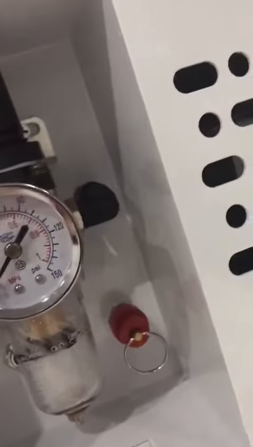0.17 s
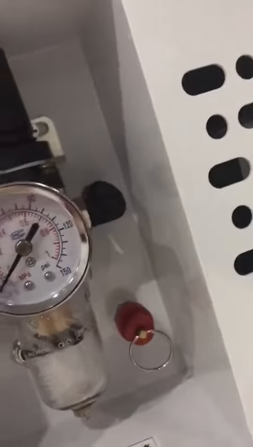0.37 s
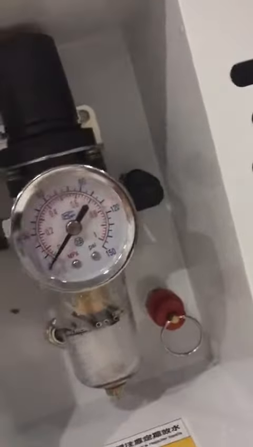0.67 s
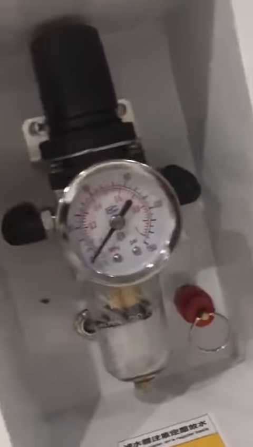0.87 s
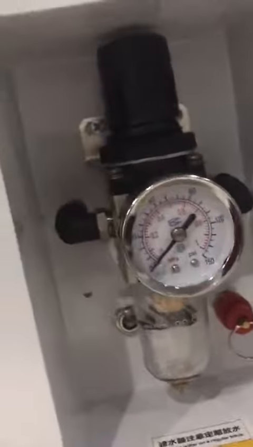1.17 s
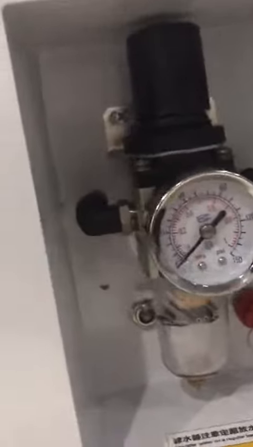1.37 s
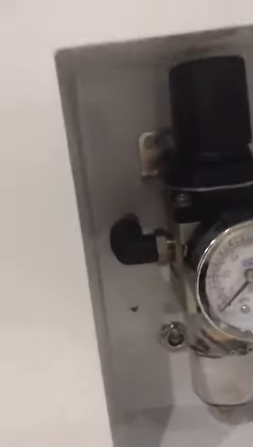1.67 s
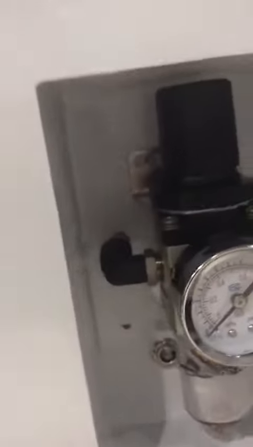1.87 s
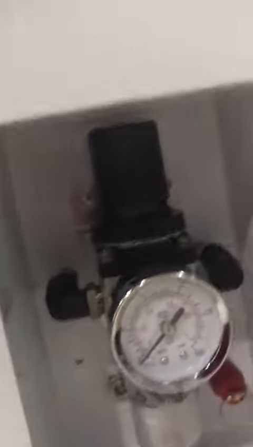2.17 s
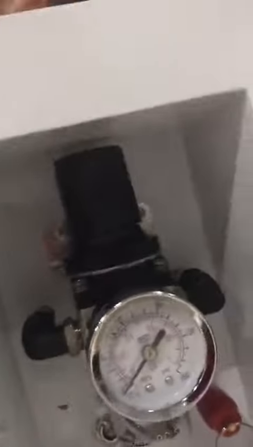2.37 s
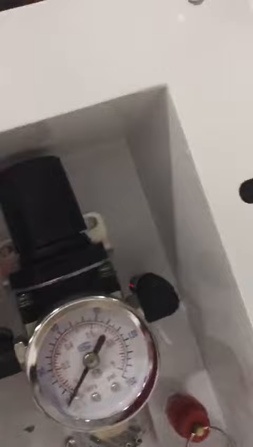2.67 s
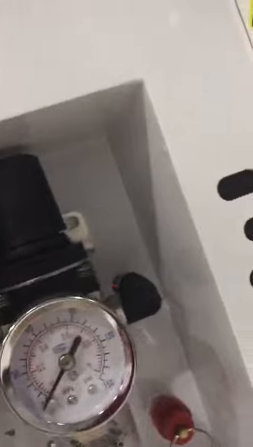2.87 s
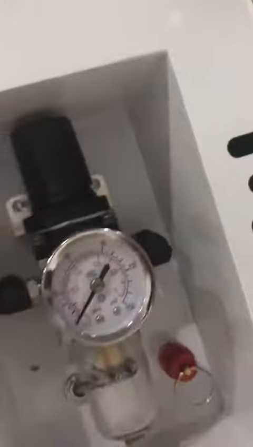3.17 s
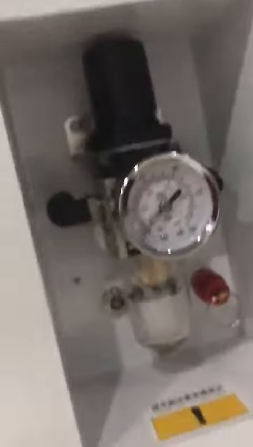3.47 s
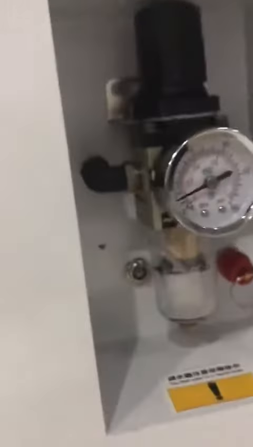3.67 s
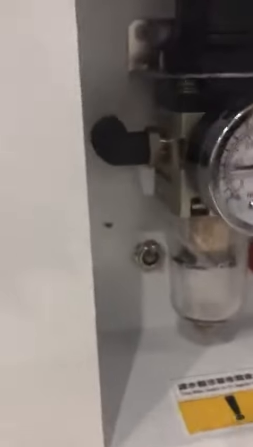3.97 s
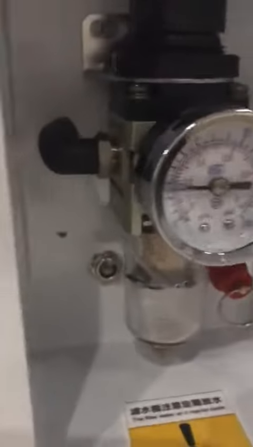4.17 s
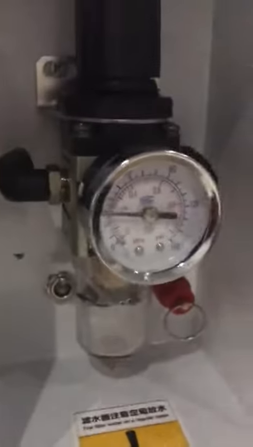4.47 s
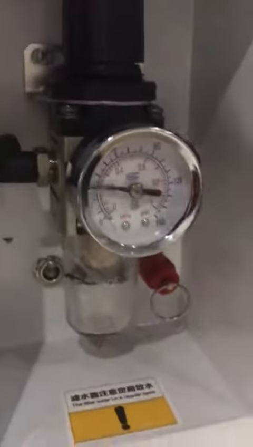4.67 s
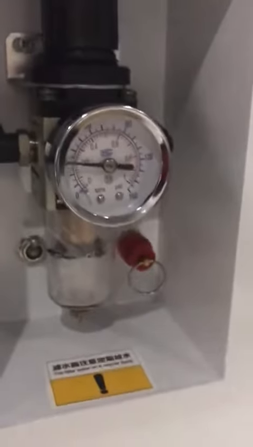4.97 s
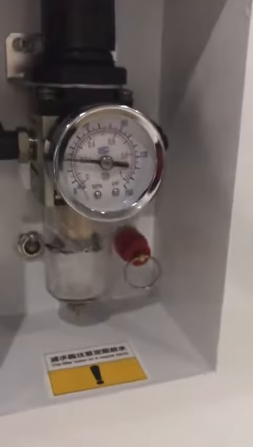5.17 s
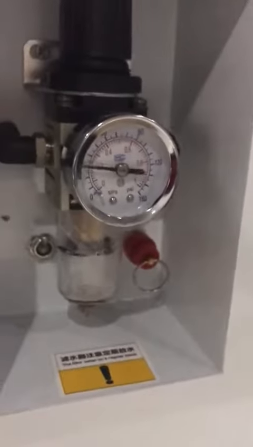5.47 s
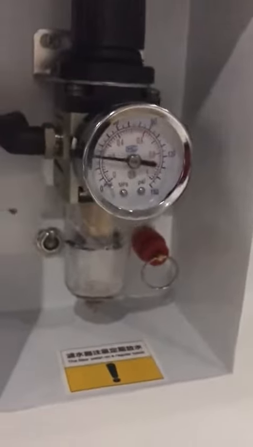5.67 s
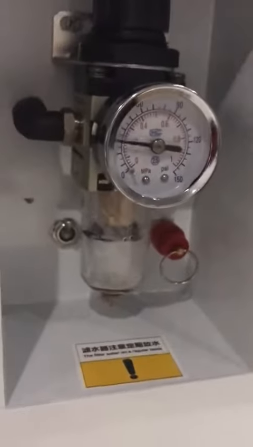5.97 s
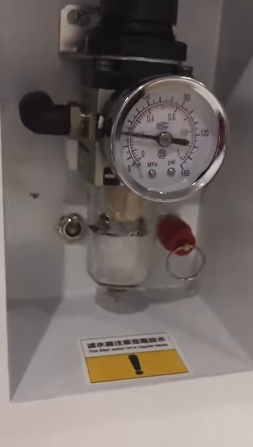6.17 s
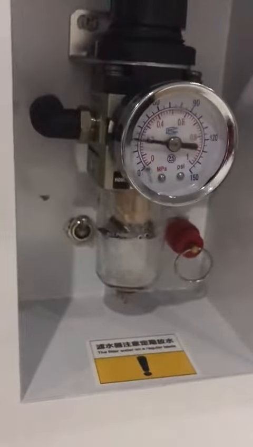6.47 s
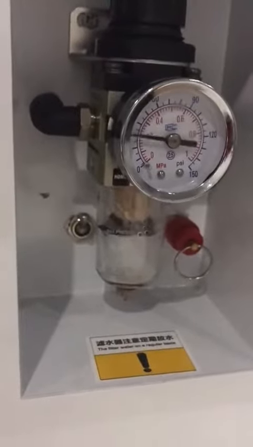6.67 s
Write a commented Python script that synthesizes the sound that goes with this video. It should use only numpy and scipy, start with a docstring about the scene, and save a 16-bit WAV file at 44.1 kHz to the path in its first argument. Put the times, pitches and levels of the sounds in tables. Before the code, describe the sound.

In a ventilated machine room a switch snaps twice, a relay cracks hard, and a small air compressor starts and chugs with gritty hiss.

```python
"""Duct rumble and faint fan tones come first: a ventilated machine room, one microphone in front of a cabinet.
A switch is pressed and let go, something knocks dully behind the panel, then a contactor slams in and
the motor pulls up with a short hum. In the sheet-metal cabinet a small piston air compressor settles near
24 turns a second: a low throb, a rasp of air and valve taps on every turn, over a steady hiss.
Air and cracks are filtered noise, knocks and taps are decaying sines, the throb is a sum of crank multiples."""
import sys
import numpy as np
from scipy import signal
from scipy.fft import rfft, irfft, next_fast_len
from scipy.io import wavfile
from scipy.ndimage import uniform_filter1d

SR = 44100
rng = np.random.default_rng(int(sys.argv[2]) if len(sys.argv) > 2 else 0)


def int16_out(signal):
    """Quantize to a 16-bit WAV file."""
    q = np.round(np.clip(np.atleast_2d(signal).T, -1, 1) * 32767)
    wavfile.write(sys.argv[1], SR, q.astype(np.int16))


N = 300762
TIME = np.arange(N) / SR  # seconds
SIZE = next_fast_len(N + SR, real=True)  # transform length, with a spare second for filter tails
HZ = np.maximum(np.arange(SIZE // 2 + 1) * SR / SIZE, 1)  # kept above 0 for the logarithm
ROOM_T60_S = 0.56


def from_db(db):
    """Decibels to gain."""
    return 10 ** (np.asarray(db) / 20)


def rms_one(x):
    """Scale to unit rms."""
    return x / np.sqrt(np.mean(x ** 2) + 1e-20)


def white():
    """Fresh white noise."""
    return rng.standard_normal(N)


def drift(rate):
    """Straight lines between random points, `rate` points a second; the last of 4096 points is held."""
    return np.interp(TIME * rate, np.arange(4096), rng.standard_normal(4096))


def ramp(start_s, length_s):
    """Straight rise from 0 to 1."""
    return np.clip((TIME - start_s) / length_s, 0, 1)


def slope(points):
    """Gain over frequency from (Hz, dB) points, joined on a logarithmic frequency axis."""
    hz, db = np.transpose(points)
    return from_db(np.interp(np.log(HZ), np.log(hz), db))


def peaks(resonances):
    """Gain over frequency of (Hz, width Hz, dB) resonances with steep skirts, added in power."""
    power = 0
    for hz, width, db in resonances:
        power = power + from_db(2 * db) / (1 + ((HZ - hz) / width) ** 2 * 2) ** 2
    return np.sqrt(power)


def colour(x, gain):
    """Causal (minimum-phase) filter that keeps the level of white noise, so only the gain's shape counts."""
    cepstrum = irfft(np.log(rms_one(gain) + 1e-6))
    # folding the cepstrum forward in time makes the phase minimal
    cepstrum[1:SIZE // 2] *= 2
    cepstrum[SIZE // 2 + 1:] = 0
    response = np.exp(rfft(cepstrum))
    return irfft(rfft(x, SIZE) * response)[:N]


def clicks(times, db):
    """Single-sample blows."""
    out = np.zeros(N)
    places = np.clip(np.round(np.asarray(times) * SR).astype(int), 0, N - 1)
    np.add.at(out, places, from_db(db))
    return out


def ring(blows, modes):
    """Blows set decaying sines (Hz, dB, t60 s) ringing, with alternating polarity from mode to mode."""
    out = np.zeros(N)
    for k, (hz, db, t60) in enumerate(modes):
        radius = from_db(-60 / (t60 * SR))  # decay per sample
        angle = 2 * np.pi * hz / SR
        resonator = [1, -2 * radius * np.cos(angle), radius * radius]
        mode = signal.lfilter([0, np.sin(angle)], resonator, blows + 1e-18)
        out += (-1) ** (k + 1) * from_db(db) * mode
    return out


def bursts(times, levels_db, t60s):
    """Crowds of high modes, heard as noise that dies quickly after each blow."""
    fade = np.zeros(N)
    for s, db, t60 in zip(times, levels_db, t60s):
        decay = np.exp(-np.log(1000) * np.clip((TIME - s) / t60, 0, 10))
        fade += from_db(db) * (TIME >= s) * decay
    return fade * white()


def room(x, wet_db):
    """Add the diffuse tail of the machine room, as decaying noise with a softened top."""
    t = TIME[:SR]
    tail = rng.standard_normal(SR) * np.exp(-np.log(1000) * t / ROOM_T60_S) * (1 - np.exp(-t / 0.00046))
    tail = signal.sosfilt(signal.butter(1, 9000, fs=SR, output="sos"), tail)
    return x + from_db(wet_db) * signal.fftconvolve(x, tail / np.linalg.norm(tail))[:N]


# Rumble of the ventilation. Each row: frequency in Hz, relative density in dB.
VENT = [(15, -51), (25, -12.5), (54, -0.5), (91, -6.5), (126, -3), (208, -7), (318, -12.5), (414, -15),
        (448, -21.5), (569, -19.5), (781, -25), (846, -21), (1560, -29), (2860, -37), (14000, -57.5)]
# Resonances of the ducts. Each row: frequency in Hz, width in Hz, relative level in dB.
DUCT = [(45.7, 5.2, -0.5), (129.2, 21, 3.5), (207.7, 24, 1), (960, 450, -34), (2924, 42, -24)]
# Fan tones. Each row: frequency in Hz, middle level in dB (rms).
VENT_TONES = [(371.4, -60.5), (414.3, -54)]
VENT_DB, DUCT_DB = -41.5, -44.5


def ventilation():
    """Noise shaped into duct rumble, with faint fan tones that waver in level and phase."""
    rumble = from_db(VENT_DB) * colour(white(), slope(VENT))
    ducts = from_db(DUCT_DB) * colour(white(), peaks(DUCT))
    tones = np.zeros(N)
    for hz, db in VENT_TONES:
        level = from_db(db + 1.9 * drift(7.7)) * np.sqrt(2)
        tones += level * np.sin(2 * np.pi * hz * TIME + 2.1 * drift(3.2))
    return rumble + ducts + tones


# Contacts of the switch. Each row: time in seconds, snap in dB, panel ring in dB, low thud in dB,
# t60 of the snap in seconds.
SWITCH = [(1.677, -50, -64, -51, 0.068), (1.8618, -26, -33, -31, 0.066), (1.8675, -39, -33, -30, 0.014),
          (1.876, -56, -48, -42, 0.026), (1.89, -64, -52, -35, .03), (1.942, -47, -49, -52, 0.15),
          (1.9539, -25, -31, -45, 0.049), (1.9596, -36, -31, -46, 0.08)]
# Colour of the plastic snap. Each row: frequency in Hz, relative level in dB.
SNAP = [(200, -28), (550, -8), (900, 7.5), (1450, 0.5), (2000, 4.5), (2300, 2), (3000, 1), (4500, -7),
        (6000, -8.5), (7600, -4.5), (10000, -10.5), (14000, -16)]
# Hollow resonances of the thud. Each row: frequency in Hz, width in Hz, relative level in dB.
THUD = [(263, 150, 8), (650, 320, 3), (850, 280, 4)]
# The panel answers press and release differently. Each row: frequency in Hz, dB on the press,
# dB on the release, t60 in seconds.
PANEL = [(655, -13, -22, 0.056), (800, -5, -11, 0.044), (880, -8, -3, 0.055), (984, -3, -14, .04),
         (1126, -13, -7, .04), (1645, -13, -15, .06), (1950, -2, -2, 0.05), (2490, -21, -8, .04),
         (3320, -22, -4, .04)]
# Dull, diffuse afterglow of the panel. Each row: frequency in Hz, width in Hz, relative level in dB.
AFTERGLOW = [(896, 320, -2), (1500, 710, -14)]
AFTERGLOW_DB, AFTERGLOW_T60_S = -17.5, 0.55  # level against the panel ring
RELEASE_S = 1.92  # contacts from here on belong to the release


def switch():
    """Press and release: a plastic snap that rings the panel, a hollow rattle as the button bottoms out."""
    s, snap_db, ring_db, thud_db, t60 = np.transpose(SWITCH)
    snap = colour(bursts(s, snap_db, t60), slope(SNAP))
    thud = colour(bursts(s, thud_db, 2.46 * t60), peaks(THUD))
    glow_t60 = np.full(len(s), AFTERGLOW_T60_S)
    afterglow = colour(bursts(s, ring_db + AFTERGLOW_DB, glow_t60), peaks(AFTERGLOW))
    blows = clicks(s, ring_db)
    press_modes = [(hz, db, t) for hz, db, _, t in PANEL]
    release_modes = [(hz, db, t) for hz, _, db, t in PANEL]
    press = ring(blows * (TIME < RELEASE_S), press_modes)
    release = ring(blows * (TIME >= RELEASE_S), release_modes)
    return room(snap + thud, wet_db=-16.5) + press + release + afterglow


# Dull knock inside the cabinet. Each row: time in seconds, level in dB.
KNOCK = [(3.009, -35), (3.012, -21.5)]
# Its ring. Each row: frequency in Hz, level in dB, t60 in seconds.
KNOCK_RING = [(73.6, -7.5, 0.35), (242, -10, 0.17)]
# Its short, heavily damped body. Each row: frequency in Hz, width in Hz, relative level in dB.
KNOCK_BODY = [(450, 170, -6), (810, 210, 4), (1260, 150, -12)]
KNOCK_BODY_DB, KNOCK_BODY_T60_S = 0.5, 0.027  # level against the knock
KNOCK_TICK_DB, KNOCK_TICK_T60_S = -35.5, 0.04


def knock():
    """A soft double contact behind the panel: low ringing sines, a damped noise body and a faint tick."""
    s, db = np.transpose(KNOCK)
    # the tick shares the colour of the contactor's crack
    tick = colour(bursts(s, db + KNOCK_TICK_DB, np.full(len(s), KNOCK_TICK_T60_S)), slope(CRACK))
    body = colour(bursts(s, db + KNOCK_BODY_DB, np.full(len(s), KNOCK_BODY_T60_S)), peaks(KNOCK_BODY))
    return room(tick + body + ring(clicks(s, db), KNOCK_RING), wet_db=-15)


# Contactor: first touch, armature home, bounces. Each row: time in seconds, crack in dB, clunk in dB,
# cabinet boom in dB, t60 of the crack in seconds.
CONTACTOR = [(3.2662, -16.5, -27, -40, 0.022), (3.272, -19, -25, -13.5, 0.029),
             (3.2743, -15, -23, -17, 0.03), (3.277, -16.5, -21.5, -23, 0.038),
             (3.287, -34, -35, -37, 0.045), (3.295, -34, -30, -31, 0.055), (3.301, -46, -45, -41, .04)]
# Colour of the crack. Each row: frequency in Hz, relative level in dB.
CRACK = [(200, 7), (800, -12), (1600, -2), (2500, 6), (4100, 1.5), (4600, 7.5), (5100, 5), (6500, 2),
         (9000, 5), (12300, 8), (13200, 2), (14500, -16)]
# Crowded resonances of the mounting plate. Each row: frequency in Hz, width in Hz, relative level in dB.
CLUNK = [(190, 66, 5.5), (320, 110, -1), (640, 55, 5), (950, 81, -5), (1400, 140, -2), (1706, 72, 4),
         (1920, 57, -3), (2260, 81, -13), (2510, 160, -5), (3520, 110, -7), (4560, 120, -7)]
# Boom of the cabinet. Each row: frequency in Hz, level in dB, t60 in seconds.
CABINET = [(99, -1.5, 0.092), (159, 2, 0.06), (200, -5.5, 0.08), (245, -11, 0.07), (339, -12.5, 0.06),
           (424, -15.5, 0.069), (635, -10.5, 0.061), (950, -13, 0.05)]
# The loose panels shiver on after the slam. Each row: frequency in Hz, relative level in dB.
SHIVER = [(100, 0), (180, 16), (300, 15), (550, -10), (950, -6), (1300, 12.5), (1900, 1), (2800, 0),
          (3500, -12), (4500, -8), (7000, -10), (10000, -4), (13000, -19)]
CLUNK_T60_S = 0.038
SHIVER_DB, SHIVER_T60_S = -19.5, 0.3  # level against the cabinet boom


def contactor():
    """The armature slams home with a bright crack and a dry clunk, booms the cabinet and shivers its panels."""
    s, crack_db, clunk_db, boom_db, t60 = np.transpose(CONTACTOR)
    crack = colour(bursts(s, crack_db, t60), slope(CRACK))
    clunk = colour(bursts(s, clunk_db, np.full(len(s), CLUNK_T60_S)), peaks(CLUNK))
    shiver = colour(bursts(s, boom_db + SHIVER_DB, np.full(len(s), SHIVER_T60_S)), slope(SHIVER))
    boom = ring(clicks(s, boom_db), CABINET)
    return clunk + room(crack, wet_db=-15) + shiver + room(boom, wet_db=-8.0)


# Magnetic hum while the motor pulls up. Each row: time in seconds, middle level in dB (rms).
HUM_LEVEL = [(3.40, -62), (3.43, -40), (3.46, -46), (3.5, -27.5), (3.53, -34), (3.56, -28.5), (3.62, -40),
             (3.685, -34), (3.76, -55)]
HUM_HZ, RUNNING_HUM_DB, RUNNING_HUM_RISE_S = 99.1, -43.5, 0.23


def motor_hum():
    """The motor hums unsteadily under its starting load, and more softly once it is up to speed."""
    s, db = np.transpose(HUM_LEVEL)
    starting = from_db(np.interp(TIME, s, db)) * (TIME > s[0]) * (TIME < s[-1])
    running = from_db(RUNNING_HUM_DB) * ramp(s[-1], RUNNING_HUM_RISE_S)
    waver = from_db(1.3 * drift(40))
    tone = np.sqrt(2) * np.sin(2 * np.pi * HUM_HZ * TIME + 0.51 * drift(28))
    return (starting + running) * waver * tone


# Shaking of the cabinet. Each row: multiple of the crank speed, relative level in dB.
THROB = [(1, -24), (2, 3), (3, 3), (4, -4), (5, -4), (6, -4), (7, -2.5), (8, -18.5), (9, -14), (10, -18),
         (11, -18), (12, -18.5), (13, -23), (14, -14.5), (15, -17)]
# The third multiple swells and sinks. Each row: time in seconds, change of its level in dB.
THIRD_SWELL = [(3.5, -23), (4.0, -1), (4.9, 0), (5.6, -4.5), (6.8, -7)]


def throb(turns):
    """The piston shakes the cabinet at multiples of the crank speed; panels smear each kick over the turn."""
    swell_db = np.interp(TIME, *np.transpose(THIRD_SWELL))
    total = np.zeros(N)
    for k, db in THROB:
        level = from_db(db + (k == 3) * swell_db) * from_db(1.2 * drift(6))
        # k * k / 14 spreads the phases, so the kicks are smeared
        total += level * np.sin(2 * np.pi * (k * turns + k * k / 14 + .05 * drift(7)))
    return rms_one(total)


# Valve taps in each turn. Each row: crank angle as a part of a turn, middle level in dB.
TAPS = [(0.54, -35.5), (0.665, -37), (0.99, -39)]
# Their ring. Each row: frequency in Hz, level in dB, t60 in seconds.
VALVE = [(370, -10.5, 0.028), (666, -10, 0.042), (790, -1.5, 0.014), (896, -0.5, 0.033), (985, 2, 0.012),
         (1060, -2, 0.04), (1115, -6.5, 0.023), (1350, -2, .016)]


def valves(turns):
    """The reeds tap shut at fixed crank angles, nearly alike on every turn, and ring as decaying sines."""
    whole = np.arange(int(turns[-1]))
    uneven_db = rng.normal(0, 1.5, len(whole))  # shared by the taps of a turn
    blows = np.zeros(N)
    for angle, db in TAPS:
        blows += clicks(np.interp(whole + angle, turns, TIME), db + uneven_db)
    return ring(blows, VALVE)


def stroke(turns, shape):
    """Air flow over each turn: the reed opens quickly, holds and closes slowly."""
    opens, attack, hold, release = shape
    return np.interp((turns - opens) % 1, np.cumsum([0, attack, hold, release]), [0, 1, 1, 0])


# crank speed under load; it starts a little faster and settles with this time constant
TURNS_PER_S, UNLOADED_EXTRA_HZ, SETTLE_S = 24.16, .21, .5


def even(x):
    """Narrow the differences in power from turn to turn: every stroke moves about the same air."""
    turn_power = uniform_filter1d(rms_one(x) ** 2, int(SR / TURNS_PER_S))
    return rms_one(x / (turn_power + .1) ** .25)


# Bright spit of air as the reed lifts. One row, in parts of a turn: opens at, attack, hold, release.
SPIT = (.7, .12, .08, .42)
SPIT_ABOVE_HZ = 4300


def spit(turns):
    """A bright jet of air in every gulp: gated noise with the low end cut."""
    highpass = signal.butter(2, SPIT_ABOVE_HZ, "high", fs=SR, output="sos")
    return signal.sosfilt(highpass, stroke(turns, SPIT) * white())


# Flow through the valve. One row, in parts of a turn: opens at, attack, hold, release.
GULP = (.55, .2, .27, .38)
# Resonances of the pump head and air filter. Each row: frequency in Hz, width in Hz, relative level in dB.
HEAD = [(1058, 38, -3.2), (1140, 60, -11), (1287, 50, .8), (1360, 56, -1.8), (1655, 54, -2.3),
        (1738, 35, -8), (1834, 28, -4.5), (1944, 36, -5), (2035, 36, -9), (2102, 38, -5),
        (2290, 120, -11.5), (2480, 125, -10), (2905, 65, -9.7), (3290, 50, -15), (3415, 60, -8),
        (3560, 150, -15.5), (3880, 90, -17.5), (4080, 150, -17), (4380, 80, -19), (4560, 110, -17.5)]
# Rush of air beneath the resonances. Each row: frequency in Hz, relative level in dB.
RUSH = [(200, -23), (600, -12), (1100, 9), (2200, 6.5), (3150, -20), (4000, -18), (6000, -2), (7200, -3),
        (9000, -0.5), (14000, -27)]
LEAK_DB = -16  # flow left between gulps
# the lower and upper rings of the head swell and sink apart from each other
HEAD_SPLIT_HZ, HEAD_WANDER_DB = 1500, .9
LOWER_DB, UPPER_DB, RUSH_DB = -4.6, -4.3, -11.5


def rasp(turns):
    """Air tears past the reed valve in gritty gulps, no two quite alike, and rings the pump head."""
    grit = rms_one(white() * from_db(2.0 * drift(700)))
    flow = stroke(turns, GULP)
    head = colour(grit * (flow + from_db(LEAK_DB)), peaks(HEAD))
    lower = signal.sosfiltfilt(signal.butter(6, HEAD_SPLIT_HZ, fs=SR, output="sos"), head)
    rings = np.zeros(N)
    for part, db in [(lower, LOWER_DB), (head - lower, UPPER_DB)]:
        rings += from_db(db + HEAD_WANDER_DB * drift(9)) * even(part)
    rush = colour(white() * rms_one(flow + from_db(-8)), slope(RUSH))
    return rings + from_db(RUSH_DB) * rush


# Steady hiss of the running machine. Each row: frequency in Hz, relative level in dB.
HISS = [(40, 2), (75, 15), (120, 24.5), (200, 12.5), (350, 13.5), (520, 13.5), (1000, 11.5), (2400, 12),
        (3100, 10.5), (3450, 11.5), (4500, 9), (5100, 5.5), (6100, 8.5), (7400, -6), (8200, 7.5), (8800, 2),
        (9400, 7), (10200, -3), (11000, 6.5), (11800, 1), (12200, 6), (12700, 2), (14000, 5)]
FIRST_STROKE_S = 3.442
# the air starts to move just before the first stroke
AIR_START_S, AIR_ATTACK_S, HISS_ATTACK_S = 3.408, 0.022, 0.073
# the shaking begins to fade in shortly before the air moves and swells through the first strokes
SHAKE_START_S, SHAKE_RISE_S = 3.32, 0.23
PRESSURE_RISE_S = 0.34  # time constant of the back pressure in the line
# throb and hiss at full pressure, and how much weaker they are with none; the spit follows the hiss
THROB_DB, THROB_SLACK_DB = -35, 8
HISS_DB, HISS_SLACK_DB, SPIT_DB = -37, 7, -43
# the rasp is strongest against an empty tank and eases as it fills
RASP_DB, RASP_EASE_DB_PER_S = -32, 0.79
RASP_SLACK_DB, RASP_RISE_S = 3.5, 0.15  # the first gulps are weaker: by how much, time constant


def compressor():
    """The pump takes over: growing back pressure raises throb and hiss, slows the crank and eases the rasp."""
    age = np.maximum(TIME - FIRST_STROKE_S, 0)
    extra_turns = UNLOADED_EXTRA_HZ * SETTLE_S * (1 - np.exp(-age / SETTLE_S))
    turns = TURNS_PER_S * (TIME - FIRST_STROKE_S) + extra_turns
    slack = np.exp(-age / PRESSURE_RISE_S)  # share of the back pressure still to come

    rasp_db = RASP_DB - RASP_EASE_DB_PER_S * age - RASP_SLACK_DB * np.exp(-age / RASP_RISE_S)
    gulps = ramp(AIR_START_S, AIR_ATTACK_S) * from_db(rasp_db) * rasp(turns)

    hiss = from_db(HISS_DB) * colour(white(), slope(HISS)) + from_db(SPIT_DB) * spit(turns)
    hiss_level = from_db(0.31 * drift(4) - HISS_SLACK_DB * slack)
    stream = ramp(AIR_START_S, HISS_ATTACK_S) ** 2 * hiss_level * hiss

    body = from_db(THROB_DB - THROB_SLACK_DB * slack) * throb(turns) + valves(turns)
    return room(gulps + stream, wet_db=-17) + ramp(SHAKE_START_S, SHAKE_RISE_S) * body


def scene():
    """Everything at one microphone in front of the cabinet."""
    mix = ventilation() + switch() + knock() + contactor() + motor_hum() + compressor()
    return mix[None]


CUTOFF_HZ = 14100


def record(dry):
    """The microphone drops the deepest bass; the top is cut steeply."""
    thin = signal.sosfilt(signal.butter(6, 36, "high", fs=SR, output="sos"), dry)
    return signal.sosfilt(signal.ellip(12, .1, 80, CUTOFF_HZ, fs=SR, output="sos"), thin)


dry = scene()
out = record(dry)
int16_out(out)
```